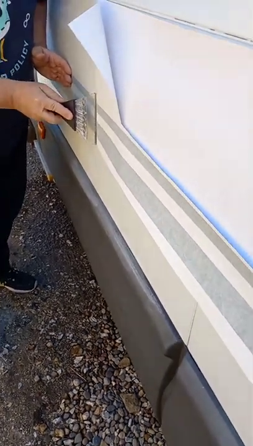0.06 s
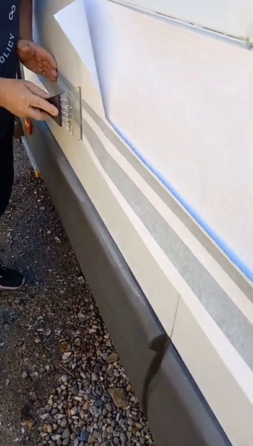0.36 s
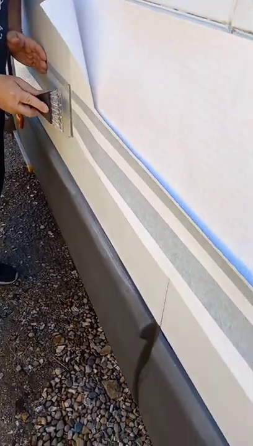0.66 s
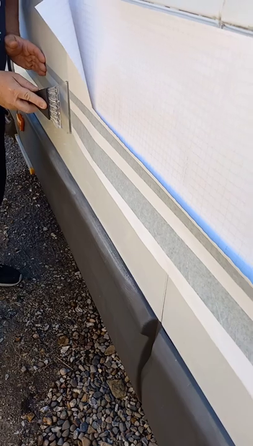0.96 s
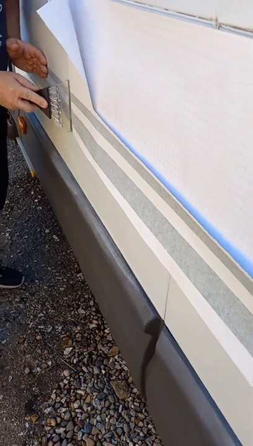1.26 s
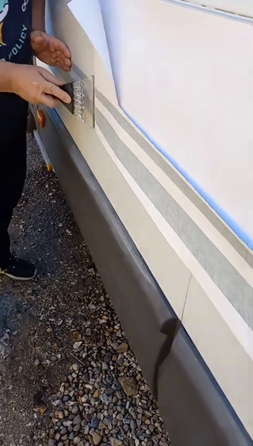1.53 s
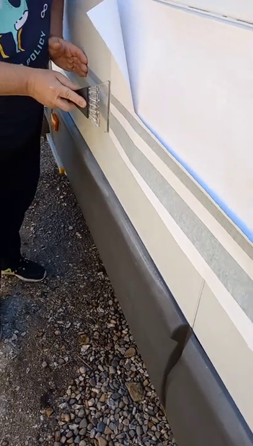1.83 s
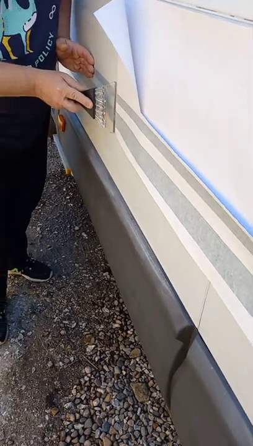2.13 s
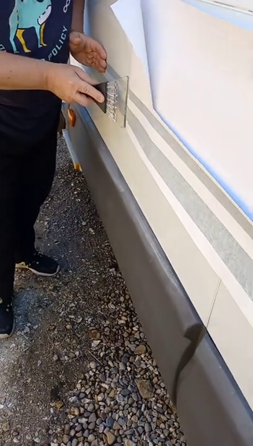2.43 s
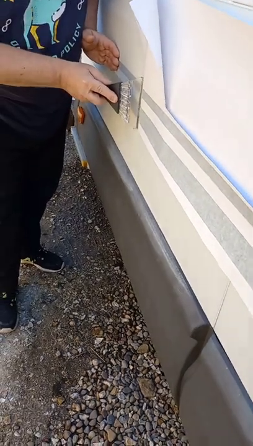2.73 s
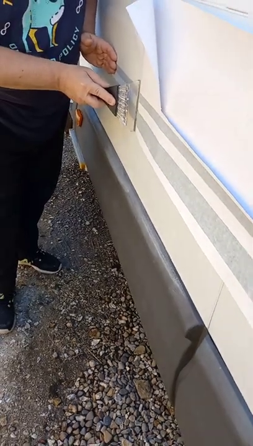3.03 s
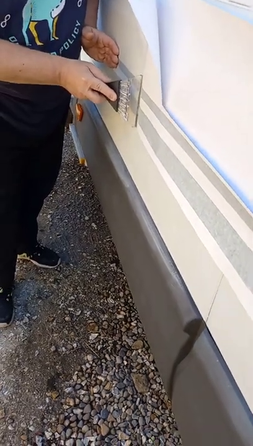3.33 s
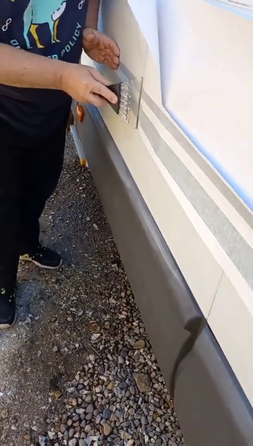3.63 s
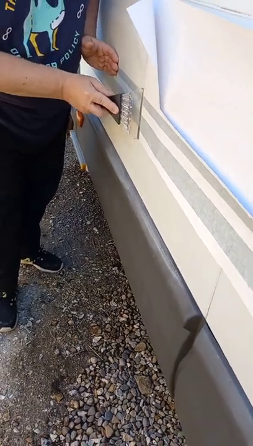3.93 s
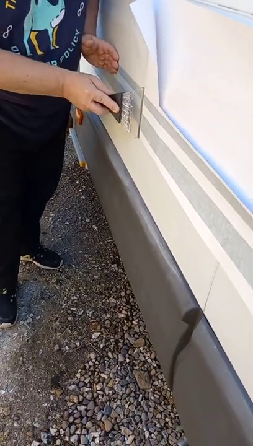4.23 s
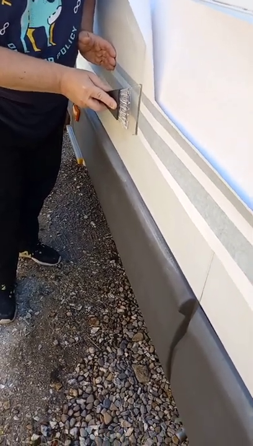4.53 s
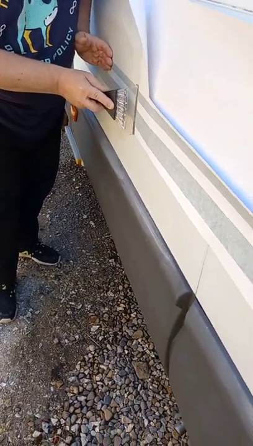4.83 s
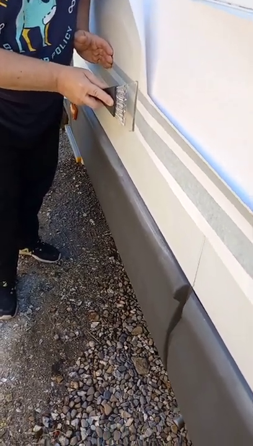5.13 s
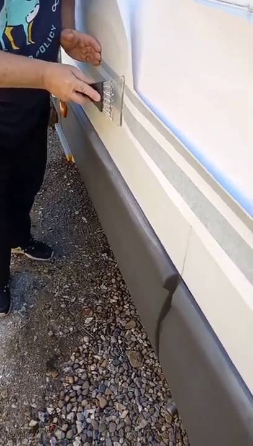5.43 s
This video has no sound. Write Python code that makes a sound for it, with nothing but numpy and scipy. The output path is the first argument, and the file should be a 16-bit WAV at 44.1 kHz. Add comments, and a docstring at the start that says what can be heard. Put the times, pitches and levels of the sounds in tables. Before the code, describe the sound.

Sticky crackling scrapes give way to light, rhythmic squeegee rubbing over a taped decal outdoors, with one hard clack and faint distant traffic.

```python
"""A hand squeegee works a taped vinyl decal onto the side of a vehicle, outdoors.
The tacky tape grips and slips in three crackling scrapes, its stretched film ringing. The blade
swishes over the paper grain, a firm push and a light return nearly four times a second, with a few
ticks, small air pops and one sharp clack on the panel. The panel booms softly under the hand,
and a distant car passes with engine drone and tyre roar."""
import sys
import numpy as np
from scipy import signal
from scipy.fft import rfft, irfft
from scipy.io import wavfile

SR = 44100
rng = np.random.default_rng(int(sys.argv[2]) if len(sys.argv) > 2 else 0)


def dump_mix(stems):
    """Bounce the given channels to the path in sys.argv[1] as a 16-bit WAV at rate SR."""
    frames = np.atleast_2d(stems).T  # one column per channel
    limited = np.clip(frames, -1, 1)  # hard clip at full scale
    pcm = np.round(limited * 32767).astype(np.int16)
    wavfile.write(sys.argv[1], SR, pcm)


N = 245637
T = np.arange(N) / SR
HZ = np.fft.rfftfreq(N, 1 / SR)


def amp(db):
    """Decibels to gain."""
    return 10 ** (np.asarray(db) / 20)


def read(points, hz):
    """Spectrum table interpolated over log frequency."""
    freq_hz, value = np.transpose(points)
    return np.interp(np.log(hz + 1), np.log(freq_hz + 1), value)


def curve(rows, column=1):
    """One column of a time table at every sample."""
    rows = np.asarray(rows)
    return np.interp(T, rows[:, 0], rows[:, column])


def add(mix, start_s, sound):
    """Adds a sound to the mix in place."""
    part = mix[..., max(round(start_s * SR), 0):][..., :sound.shape[-1]]
    part += sound[..., :part.shape[-1]]


def pan(left_minus_right_db):
    """Left and right gains at constant power."""
    half_db = np.atleast_1d(left_minus_right_db) / 2
    gains = amp([half_db, -half_db])
    return gains / np.sqrt(np.mean(gains ** 2, 0))


def wobble(rate_hz):
    """Slow random curve, unit deviation."""
    size, span_s = 16384, 6.0
    lowpass = 1 / (1 + (np.fft.rfftfreq(size, span_s / size) / rate_hz) ** 4)
    slow = irfft(rfft(rng.standard_normal(size)) * lowpass)
    return np.interp(T, np.arange(size) * span_s / size, slow / slow.std())


def butter(x, order, hz, kind):
    """Causal Butterworth filter."""
    return signal.sosfilt(signal.butter(order, hz, kind, fs=SR, output="sos"), x)


def colour(x, points):
    """Minimum-phase filter of unit power, shaped by a spectrum table."""
    hz = abs(np.fft.fftfreq(2048, 1 / SR))
    log_gain = np.log(amp(np.maximum(read(points, hz), -90)))
    taps = np.fft.ifft(np.exp(np.conj(signal.hilbert(log_gain)))).real
    return signal.oaconvolve(x, taps[None] / np.linalg.norm(taps), axes=1)[:, :N]


def resonate(x, hz, width_hz):
    """Unit-gain resonance that follows the curve hz."""
    carrier = np.exp(2j * np.pi * np.cumsum(hz) / SR)
    pole = np.exp(-np.pi * width_hz / SR)
    return 2 * (carrier * signal.lfilter([1 - pole], [1, -pole], x / carrier)).real


def peaks(rings):
    """Complex response of parallel resonances."""
    return sum(amp(db) / (1 + 2j * (HZ - hz) / width_hz) for hz, width_hz, db in rings)


def ring(modes, length_s):
    """Decaying modes of a struck body."""
    t = np.arange(int(length_s * SR)) / SR
    return sum(amp(db - 60 * t / t60_s) * np.sin(2 * np.pi * hz * t) for hz, db, t60_s in modes)


def blade_noise(direct_share, lag_samples):
    """Stereo white noise; a share comes straight from the blade, shifted in time on the left."""
    direct, left, right = rng.standard_normal((3, N))
    shared = np.array([np.roll(direct, lag_samples), direct])
    return np.sqrt(direct_share) * shared + np.sqrt(1 - direct_share) * np.array([left, right])


def releases(rows, lag_s=0):
    """Timed events as a train of energy impulses."""
    energy = np.zeros(N)
    for start_s, level_db in rows:
        add(energy, start_s + lag_s, amp([level_db]) ** 2)
    return energy


def bursts(energy, decay_s, tail_db, tail_s, attack_s=0.0003):
    """Each release of energy gives a spit of noise and a weaker shiver of the film."""
    t = np.arange(SR // 16) / SR
    shape = np.exp(-2 * t / decay_s) + amp(tail_db) ** 2 * np.exp(-2 * t / tail_s)
    shape *= 1 - np.exp(-t / attack_s)
    return np.sqrt(abs(signal.oaconvolve(energy, shape)[:N])) * blade_noise(0.13, lag_samples=9)


# film resonances: pitch_hz, width_hz, gain_db
FILM_MODES = [(4460, 560, -3), (6440, 840, 0.5), (7630, 600, 6), (9100, 360, -24)]
# film tuning, sinking as more tape comes free and back up at the next grip: time_s, pitch_ratio
FILM_TUNING = [(0.05, 1.1), (0.21, 0.95), (0.275, 0.77), (0.305, 1.08)]
def film(x, strength, drift=0.013, flicker_db=0.5):
    """The stretched film rings; each mode drifts and flickers as the blade's grip shifts."""
    ringing = 0
    for pitch_hz, width_hz, gain_db in FILM_MODES:
        gain = amp(gain_db + flicker_db * wobble(22))
        hz = pitch_hz * curve(FILM_TUNING) * (1 + drift * wobble(14))
        ringing += gain * resonate(x, hz, width_hz)
    return x + strength * ringing


TEAR_S = 1.22
def tear(level_db=-30, rise_s=0.008, fall_s=0.02, pitch_hz=3300):
    """A patch of tape tears free all at once in the last scrape."""
    age_s = T - TEAR_S
    swell = np.exp(-0.5 * (age_s / np.where(age_s < 0, rise_s, fall_s)) ** 2)
    rip = amp(level_db) * swell * blade_noise(0.049, lag_samples=5)
    return rip + resonate(rip, np.full(N, pitch_hz), width_hz=1500)


def scrape_envelope(start_s, length_s, level_db, sag_db_per_s, attack_s=0.0052, release_db_per_s=520):
    """The blade bites, eases off slowly and lets go."""
    age_s = np.maximum(T - start_s, 0)
    release_db = release_db_per_s * np.maximum(age_s - length_s, 0)
    return np.minimum(age_s / attack_s, 1) * amp(level_db - sag_db_per_s * age_s - release_db)


# sticky scrapes: start_s, length_s, level_db, sag_db_per_s, run_up_s
SCRAPES = [(-0.02, 0.3, -21, 24.5, 0.11), (0.318, 0.25, -23, 47.5, 0.025), (1.084, 0.37, -42, 7.5, 0.03)]
# one spectrum per scrape: freq_hz, gain_db
SCRAPE_SPECTRA = [
    [(250, -19), (520, -25), (830, -17), (1800, -17.5), (2400, -10), (3000, -19.5), (3700, -9), (5500, -14),
     (8300, -3), (10300, -7)],
    [(420, -15.5), (790, -4), (1400, -11), (2170, -5), (2800, -8.5), (3800, -0.5), (6000, -4), (8900, 0),
     (15500, 2)],
    [(480, -25.5), (1000, -6), (1270, -13), (2040, -4), (2700, -6.5), (3600, -2), (4700, -7), (8500, -7),
     (15500, -12.5)],
]
# big slips of the tape: start_s, level_db
SLIPS = [(0.0103, -17), (0.0208, -16.5), (0.0299, -13), (0.0420, -14.5), (0.0590, -17), (0.0851, -19),
         (0.1063, -12.5), (0.2127, -17), (0.2738, -20), (0.3039, -13.5), (0.3133, -13), (0.3315, -16),
         (0.3549, -13.5), (0.3990, -11.5), (0.4563, -15), (1.1323, -24), (1.1695, -27.5), (1.2195, -19),
         (1.2470, -21), (1.4143, -26), (1.4475, -22)]
def crackle(run_up_slips_per_s=180, free_slips_per_s=215, run_up_db=-10, spread_db=1.5, big_db=1.0):
    """Tacky tape holds and lets go a few hundred times a second; some slips are large."""
    free = np.ones(N)  # 0 to 1 as the blade breaks free
    for start_s, *_, run_up_s in SCRAPES:
        free = np.where(T < start_s, free, np.clip((T - start_s) / run_up_s, 0, 1) ** 4)
    slips_per_s = run_up_slips_per_s + (free_slips_per_s - run_up_slips_per_s) * free
    slip_count = rng.random() + np.cumsum(slips_per_s * np.exp(0.6 * wobble(200))) / SR
    size_db = spread_db * np.clip(rng.standard_normal(N), -2, 1.2)
    energy = np.diff(np.floor(slip_count), prepend=0) * amp(size_db) ** 2
    stretch = signal.windows.hann(SR // 700)  # glue stretches before it lets go
    stretch /= stretch.sum()
    fine = bursts(np.convolve(energy, stretch, "same"), decay_s=0.0003, tail_db=-16.5, tail_s=0.006)
    fine *= amp(run_up_db * (1 - free)) / fine.std()
    big_energy = np.convolve(releases(SLIPS, lag_s=0.00037), stretch, "same")
    big = amp(big_db) * bursts(big_energy, decay_s=0.0011, tail_db=-6.0, tail_s=0.0029) + tear()
    ends_s = [start_s + length_s for start_s, length_s, *_ in SCRAPES[:-1]]
    scrape_index = np.searchsorted(ends_s, T - 0.02)
    first, second, third = (
        colour(fine * scrape_envelope(*row[:4]) + big * (scrape_index == k), SCRAPE_SPECTRA[k])
        for k, row in enumerate(SCRAPES))
    first = amp(-3.0) * film(first, strength=0.92)
    second = amp(-1.0) * film(second, strength=0.61)
    return (first + second + third) * pan(-4.5)


# left-right likeness of diffuse sound: freq_hz, coherence
COHERENCE = [(80, 0.97), (640, 0.73), (1500, 0.025)]
def diffuse_noise(points, band_hz):
    """Stereo noise, alike in the bass, with unit level in the band."""
    left, other = rfft(rng.standard_normal((2, N)))
    coherence = read(COHERENCE, HZ)
    right = coherence * left + np.sqrt(1 - coherence ** 2) * other
    spectrum = np.array([left, right]) * amp(read(points, HZ))
    in_band = (HZ > band_hz[0]) * (HZ < band_hz[1])
    return irfft(spectrum, N) / irfft(spectrum.mean(0) * in_band, N).std()


# panel flexing: time_s, level_db
BOOM_LEVEL = [(0.2, -47), (0.76, -60), (2.6, -61), (4.25, -47), (4.36, -53.5), (5.57, -63)]
# panel rumble: freq_hz, gain_db
BOOM_SPECTRUM = [(30, -34), (50, 6), (75, 0), (140, 0), (220, -5), (340, -18), (900, -64)]
# hand thumps: start_s, level_db
THUMPS = [(1.772, -42), (4.225, -47.5), (4.773, -46.5)]
# low panel modes: pitch_hz, gain_db, t60_s
THUMP_MODES = [(137.2, 2, 0.32), (222, 3, 0.13)]
def panel():
    """The wide panel rumbles as the hand moves and thuds when pressed."""
    press = signal.windows.hann(160)
    thud = np.convolve(ring(THUMP_MODES, 0.3), press / press.sum())
    thuds = np.zeros(N)
    for start_s, level_db in THUMPS:
        add(thuds, start_s, amp(level_db) * thud)
    rumble = amp(curve(BOOM_LEVEL)) * diffuse_noise(BOOM_SPECTRUM, band_hz=(110, 300))
    return (rumble + thuds) * pan(-2.4)


# engine drone: time_s, firing_hz, level_db
ENGINE = [(0.0, 46, -46), (2.3, 46.48, -49), (2.8, 46.8, -67.5), (3.1, 46.36, -45), (4.15, 44.27, -43),
          (4.5, 41.24, -58)]
# tyre roar: freq_hz, gain_db
TYRE_SPECTRUM = [(220, -1.5), (380, -8), (550, 1), (750, 4), (1000, -1), (1500, -16), (2800, -13.5),
                 (4500, -52.5)]
def car(pass_s=3.776, near_s=0.62, tyres_db=-50, loss_db_per_decade=63, echo_gain=0.26, echo_s=0.00689):
    """Low engine drone, and tyre roar whose ground echo shifts as the car goes by."""
    distance_ratio = np.hypot(1, (T - pass_s) / near_s)
    nearness = amp(-loss_db_per_decade * np.log10(distance_ratio))
    firing_hz = curve(ENGINE) * (1 + 0.034 * wobble(7.7))
    phase = 2 * np.pi * np.cumsum(firing_hz) / SR
    drone = np.sin(phase) + nearness * np.sin(2 * phase)
    drone *= amp(curve(ENGINE, column=2) + 2.0 * wobble(23))
    roar = diffuse_noise(TYRE_SPECTRUM, band_hz=(450, 1000))
    delay_s = echo_s / np.hypot(1, (T - pass_s) / 1.01)
    roar += echo_gain * np.array([np.interp(T - delay_s, T, side) for side in roar])
    return drone + roar * nearness * amp(tyres_db + wobble(4.8))


# outdoor background: freq_hz, gain_db
AIR_SPECTRUM = [(40, -17), (65, 8.5), (130, -9.5), (250, -26.5), (400, -25.5), (850, -19), (1600, -29.5),
                (5000, -44)]
def air(level_db=-67.5, waver_db=2.8):
    """Faint, wavering outdoor hush."""
    return diffuse_noise(AIR_SPECTRUM, band_hz=(400, 2000)) * amp(level_db + waver_db * wobble(7.0))


def speed_arch(start_s, end_s, top_share, exponent):
    """Blade speed between two standstills, greatest at top_share of the stroke."""
    speed = np.zeros(N)
    moving = slice(*np.searchsorted(T, [start_s, end_s]))
    progress = (T[moving] - start_s) / (end_s - start_s)
    skew = np.log(0.5) / np.log(top_share)
    speed[moving] = abs(np.sin(np.pi * progress ** skew)) ** exponent
    return speed


# blade strokes: start_s, turn_s, push_db, return_db
STROKES = [(0.48, 0.65, -54.5, -62), (0.791, 0.94, -56, -62.5), (1.069, 1.485, -58.5, -62),
           (1.64, 1.78, -55, -58.5), (1.907, 2.064, -58, -58), (2.175, 2.317, -54, -60.5),
           (2.444, 2.646, -60.5, -75), (2.799, 2.941, -51, -58.5), (3.053, 3.181, -53, -64.5),
           (3.316, 3.45, -51, -57), (3.584, 3.738, -50, -76), (3.831, 3.999, -56, -64.5),
           (4.106, 4.279, -52, -65), (4.395, 4.55, -54.5, -67), (4.642, 4.826, -56.5, -64),
           (4.935, 5.083, -52, -61.5), (5.209, 5.358, -53.5, -64), (5.485, 5.616, -55, -63)]
# pushes sharpen as the hand finds its rhythm: time_s, arch_exponent
PUSH_SHAPE = [(2.3, 0.96), (3.4, 1.22)]
# sliding that carries on between quick strokes: time_s, level_db
DRAG = [(2.48, -100), (2.7, -68.5), (3.7, -63), (5.5, -70)]
def stroke_power(overlap_s=0.011):
    """Each push gathers speed and stops short; a lighter return lasts until the next push."""
    power = amp(curve(DRAG)) ** 2
    ends_s = [row[0] for row in STROKES[1:]] + [STROKES[-1][1] + 0.1]
    for (start_s, turn_s, push_db, return_db), end_s in zip(STROKES, ends_s):
        exponent = np.interp(start_s, *np.transpose(PUSH_SHAPE))
        push = amp(push_db) * speed_arch(start_s, turn_s, top_share=0.69, exponent=exponent)
        back = amp(return_db) * speed_arch(turn_s - overlap_s, end_s, top_share=0.39, exponent=1.22)
        power += push ** 2 + back ** 2
    return power


# blade rubbing on paper: freq_hz, gain_db
RUB_SPECTRUM = [(500, -28), (800, 1.5), (1150, -3), (1600, -6), (2200, -2.5), (3500, -1), (4900, -7.5),
                (5800, -11.5), (7700, -11.5), (9200, -5), (10300, -12.5), (15500, -14)]
# stereo balance of the rub: freq_hz, left_minus_right_db
RUB_BALANCE = [(700, -6), (1500, 0.5), (2300, -11), (3500, -3.5), (5500, -1.5), (9000, 5)]
# panel resonances under the blade: pitch_hz, width_hz, gain_db
RUB_MODES = [(1115, 59, -4.5), (2210, 330, -4)]
# sizzle of loose tape: pitch_hz, width_hz, gain_db
SIZZLE_MODES = [(11700, 380, -1.5), (13900, 600, 5)]
# blade pressure: time_s, body_gain_db
PRESSURE = [(0.9, -3.5), (2.9, 0.67)]
def swish(gain_db=-1.0, flutter_db=0.78, split_hz=4300, body_follow=0.83, pivot_db=-54):
    """The blade slides over the tape's paper grain; slow strokes are duller, the first ones sizzle."""
    speed_db = 10 * np.log10(stroke_power() + 1e-10)
    grain = blade_noise(0.25, lag_samples=-12)
    spectrum = rfft(grain) * amp(read(RUB_SPECTRUM, HZ)) * pan(read(RUB_BALANCE, HZ))
    lowpass = 1 / (1 + (HZ / split_hz) ** 8)
    spectrum /= irfft(spectrum.mean(0) * (1 - lowpass), N).std()
    sizzle = irfft(spectrum * peaks(SIZZLE_MODES), N) * (T < TEAR_S)  # until the patch tears free
    hiss = irfft(spectrum * (1 - lowpass), N) + sizzle
    body = irfft(spectrum * lowpass * (1 + peaks(RUB_MODES)), N)
    body_db = curve(PRESSURE) + pivot_db + body_follow * (speed_db - pivot_db)
    return (hiss * amp(speed_db) + body * amp(body_db)) * amp(gain_db + flutter_db * wobble(21))


# blade-edge ticks: start_s, level_db
TICKS = [(1.0958, -39), (1.531, -39), (1.5465, -39), (1.5735, -40), (2.6455, -47.5), (2.6612, -49),
         (2.6905, -39), (4.3895, -43.5)]
# tick spectrum: freq_hz, gain_db
TICK_SPECTRUM = [(2000, -35), (4000, -11), (6500, -15.5), (12000, -16)]
def ticks():
    """The blade's edge catches on the tape with a crisp tick."""
    catches = bursts(releases(TICKS), decay_s=0.0014, tail_db=-19, tail_s=0.0062)
    return colour(catches, TICK_SPECTRUM) * pan(-3.0)


# air pockets: start_s, pitch_hz, level_db
POPS = [(1.3477, 3600, -27), (1.3603, 3260, -27), (1.3701, 3480, -30)]
def pops(t60_s=0.0071):
    """Air pockets burst under the tape, each with a brief pitch."""
    out = np.zeros(N)
    for start_s, pitch_hz, level_db in POPS:
        add(out, start_s, ring([(pitch_hz, level_db, t60_s)], 0.03))
    return out * pan(-9.0)


# blade hits on the panel: start_s, blade_db, panel_db, rebound_db
CLACKS = [(2.1415, -6.5, -33, -5.5), (2.2135, -34.5, -42, -20), (2.222, -29, -35, -16)]
# blade modes: pitch_hz, gain_db, t60_s
BLADE_MODES = [(1466, 7, 0.0026), (1940, 11.5, 0.0027), (2390, -6, 0.014), (3500, -20.5, 0.011)]
# hollow panel ring: pitch_hz, gain_db, t60_s
PANEL_MODES = [(805, -0.5, 0.025), (975, -4.5, 0.035), (1355, -8, 0.045)]
# dry contact crack: freq_hz, gain_db
CRACK_SPECTRUM = [(800, -15), (2500, 0), (4000, 0), (9000, -6), (12000, -36)]
def clacks(rebound_s=0.002113, contact_s=0.00026, panel_lag_s=0.00287, echo_s=0.018, echo_db=-23):
    """Hard plastic hits the panel and rebounds; the ground echoes once, the gravel scatters the rest."""
    blows, body = np.zeros((2, N))
    for start_s, blade_db, panel_db, rebound_db in CLACKS:
        add(body, start_s + panel_lag_s, amp(panel_db) * ring(PANEL_MODES, 0.1))
        add(blows, start_s, amp([blade_db]))
        add(blows, start_s + rebound_s, amp([blade_db + rebound_db]))
    # neighbouring modes swing opposite ways
    blade = sum((-1) ** k * ring([mode], 0.1) for k, mode in enumerate(BLADE_MODES))
    # a small blade radiates no bass; the tape cushions the blow
    direct = butter(signal.oaconvolve(blows, blade)[:N], 3, [800, 1 / contact_s], "band")
    direct += amp(echo_db) * np.interp(T - echo_s, T, direct)
    spit = bursts(blows ** 2, decay_s=0.0031, tail_db=-15.5, tail_s=0.017)
    crack = amp(-26) * colour(spit, CRACK_SPECTRUM)
    body = butter(body, 3, 520, "high")
    midrange = butter(blows, 3, [720, 2400], "band")
    echoes = amp(-1.5) * scatter(midrange[None], t60_s=0.47, treble_t60_s=0.061)
    return (direct + crack) * pan(-9.0) + body * pan(-4.0) + echoes


def blade_reflection(x, gain=0.38, gap_s=0.00061, wander=0.291, rate_hz=14):
    """The blade reflects the sound over a small, changing gap, so the colour shifts."""
    delay_s = gap_s * np.exp(wander * wobble(rate_hz))
    upsampled = signal.resample_poly(x, 2, 1, axis=1)
    echo = np.array([np.interp(2 * SR * (T - delay_s), np.arange(2 * N), side) for side in upsampled])
    return (x + gain * echo) / np.hypot(1, gain)


def scatter(x, t60_s, treble_t60_s):
    """Scattered echoes off the vehicle's side and the gravel; the treble dies first."""
    t = np.arange(SR // 3) / SR
    taps = rng.standard_normal((2, len(t))) * (t > 0.003)
    low = butter(taps, 2, 3000, "low")
    tail = low * amp(-60 * t / t60_s) + 0.077 * (taps - low) * amp(-60 * t / treble_t60_s)
    return signal.oaconvolve(x, tail / np.linalg.norm(tail[0]), axes=1)[:, :N]


def scene():
    """Close work on the panel, the road behind."""
    tape = crackle() + pops() + ticks()
    squeegee = blade_reflection(tape + swish())
    echoes = amp(-14.0) * scatter(tape, t60_s=0.21, treble_t60_s=0.067)
    return squeegee + echoes + clacks() + panel() + car() + air()


def record(dry, low_cut_hz=32, high_cut_hz=15900):
    """Bass cut and band limit."""
    lowpass = signal.firwin(511, high_cut_hz, window=("kaiser", 9), fs=SR)
    return signal.oaconvolve(butter(dry, 4, low_cut_hz, "high"), lowpass[None], "same")


dry = scene()
out = record(dry)
dump_mix(out)
```